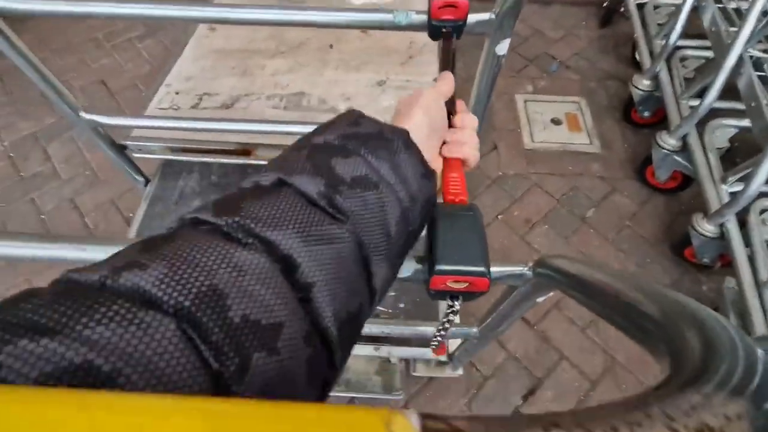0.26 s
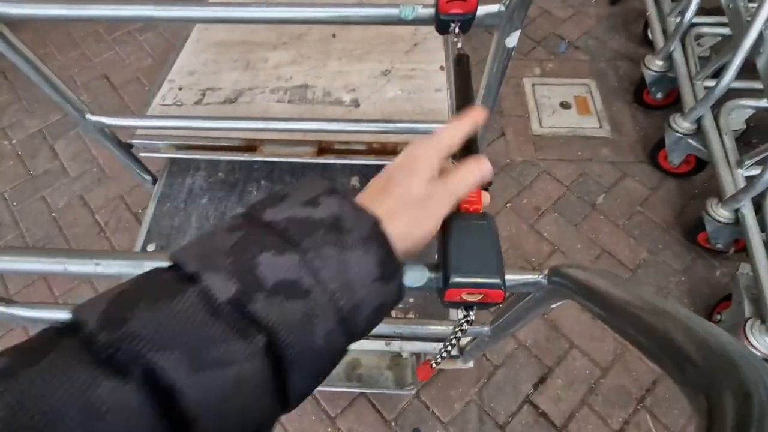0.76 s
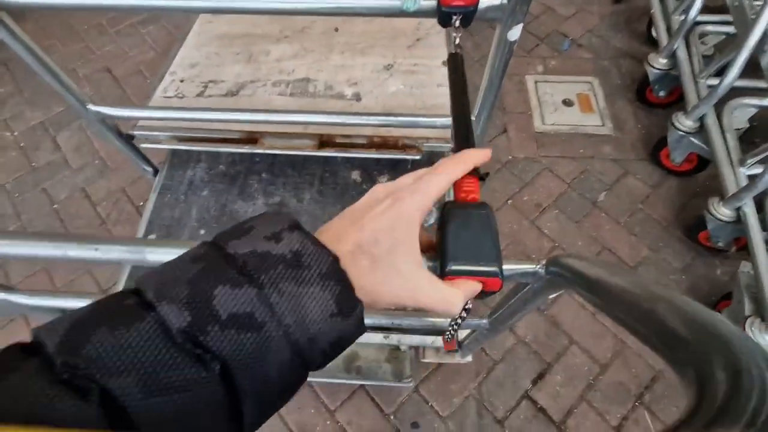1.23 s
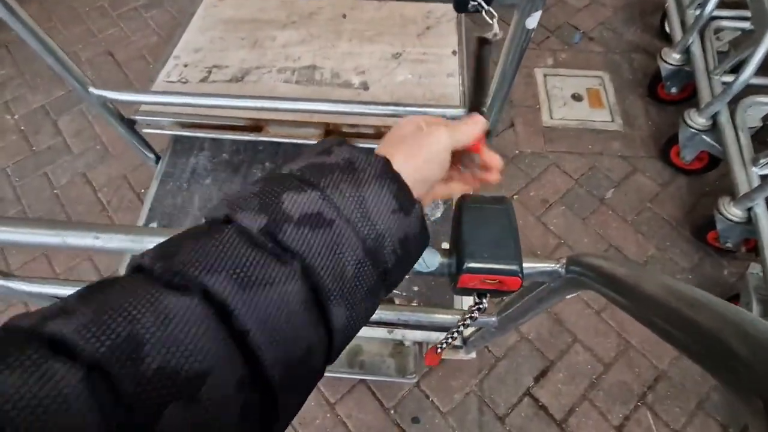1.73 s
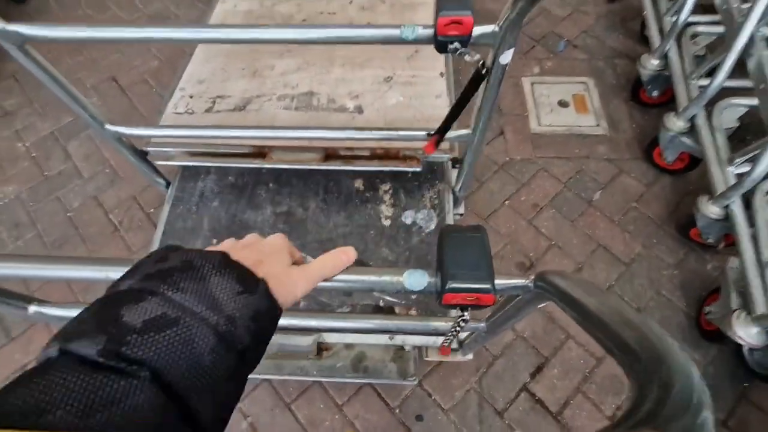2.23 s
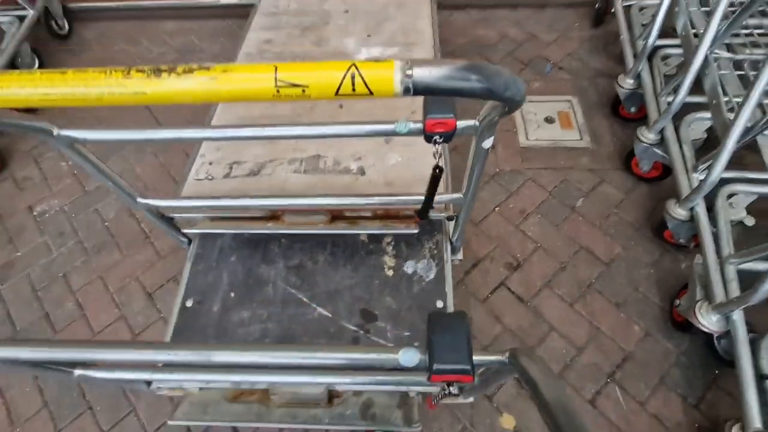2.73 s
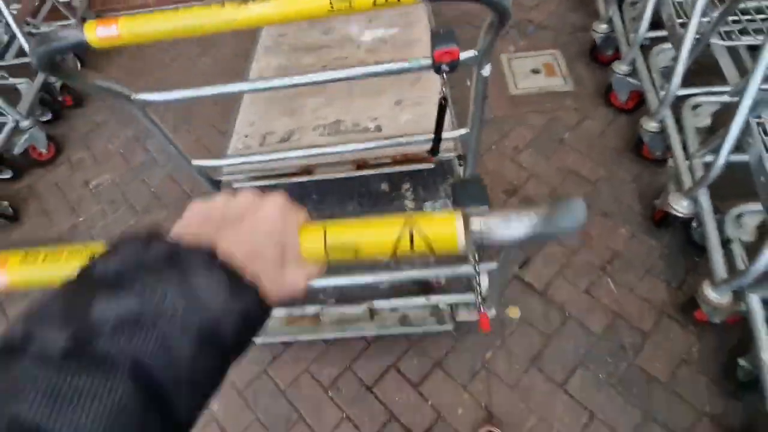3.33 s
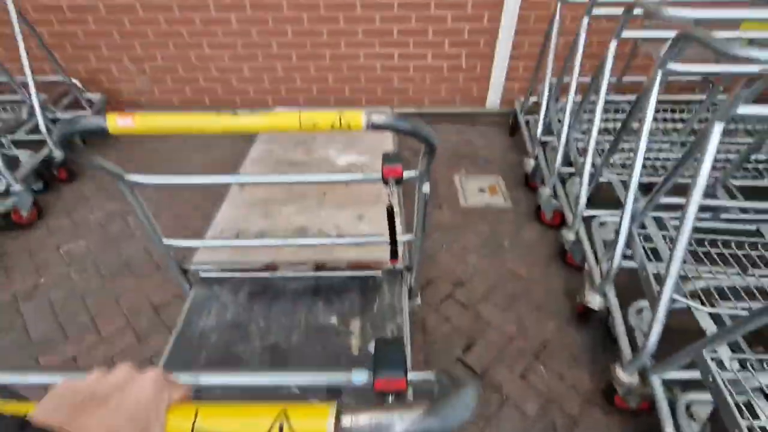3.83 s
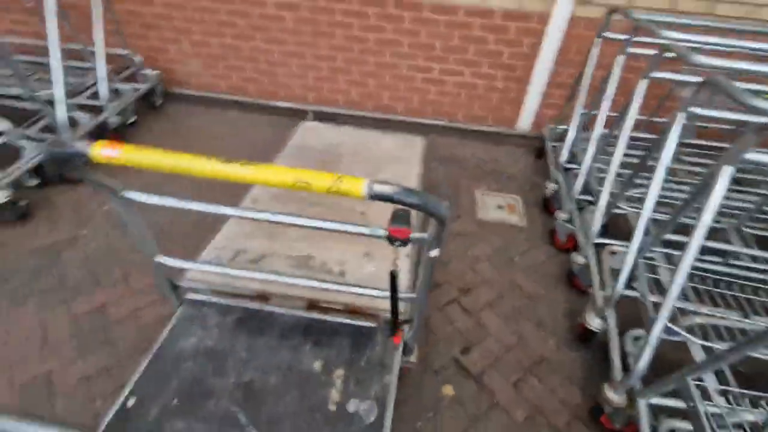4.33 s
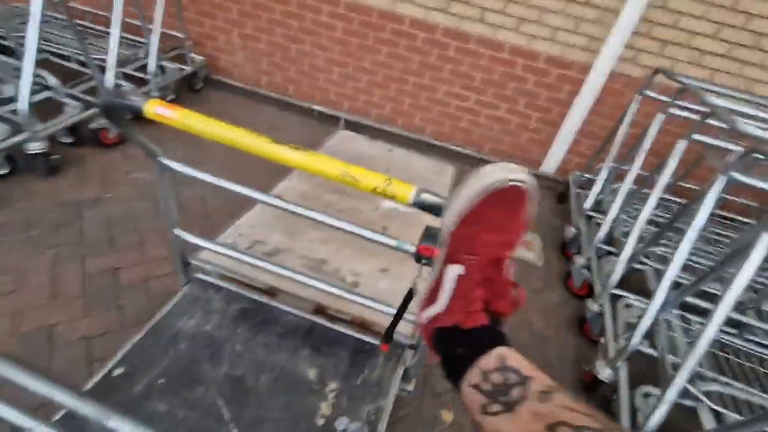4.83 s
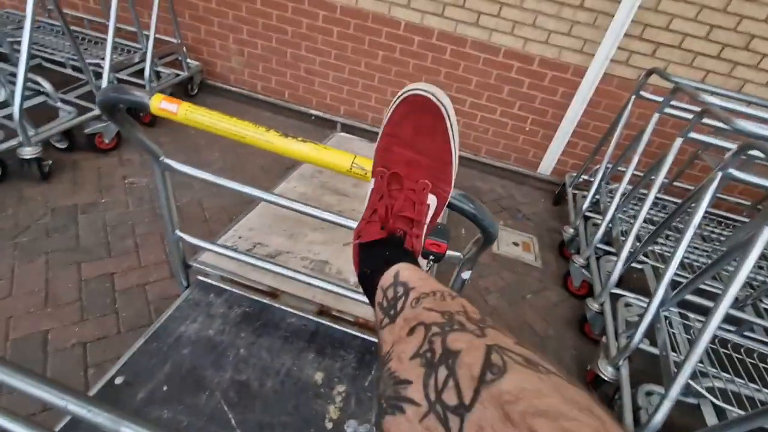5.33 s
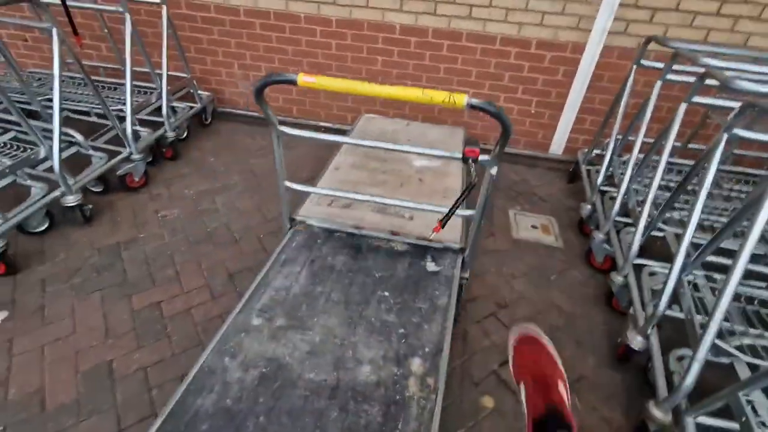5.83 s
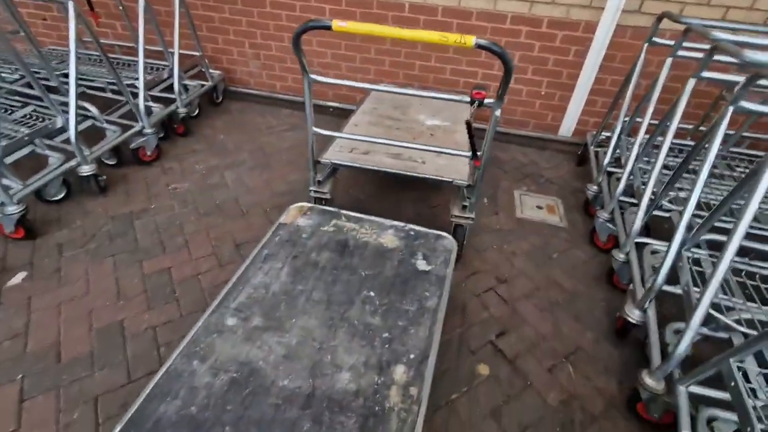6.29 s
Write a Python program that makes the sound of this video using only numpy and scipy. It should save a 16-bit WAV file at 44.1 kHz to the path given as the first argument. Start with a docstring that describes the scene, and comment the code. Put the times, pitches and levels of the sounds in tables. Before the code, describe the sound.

Sleeve rustle and small metallic clicks, a sharp snap as the key comes free, then a steel trolley bangs, booms and rattles across bricks.

```python
"""A low town rumble and throb with a sleeve rustling near the phone; then a hand fumbles the coin lock of
a steel flatbed trolley, frees the key, and the trolley is pulled over brick paving.
Rumble, rustle and throb are coloured noise. Knocks of lock, chain and swinging key are noise cracks with a
sine clink and a dying shiver, and ringing parts are beating, fading sines.
The rolling deck, frame and wheels are noise grains sent through resonances and filters."""
import sys
import numpy as np
from scipy import signal
from scipy.fft import rfft, irfft, next_fast_len
from scipy.io import wavfile
from scipy.ndimage import uniform_filter1d

SR = 44100
rng = np.random.default_rng(int(sys.argv[2]) if len(sys.argv) > 2 else 0)


def persist_wave(psi):
    """Save psi, clipped to +-1, as 16-bit WAV."""
    counts = np.round(np.clip(psi, -1, 1) * 32767).astype(np.int16)
    wavfile.write(sys.argv[1], SR, np.atleast_2d(counts).T)


N = 289205  # samples


def undb(db):
    """Amplitude ratio of a level in dB."""
    return 10 ** (np.asarray(db) / 20)


def level(x, db):
    """Scale a signal to an RMS level in dB."""
    return x * undb(db) / np.sqrt(np.mean(x ** 2))


def colour(x, points):
    """Filter by (frequency [Hz], gain [dB]) points joined on a log frequency axis."""
    n = next_fast_len(x.shape[-1])
    hz, db = np.transpose(points)
    f = np.arange(n // 2 + 1) * SR / n + 1  # the 1 avoids log(0)
    gain = undb(np.interp(np.log(f), np.log(hz), db))
    return irfft(rfft(x, n) * gain, n)[..., :x.shape[-1]]


# Stereo width at the phone: (frequency [Hz], side relative to mid [dB])
SIDE_WIDTH = [(30, -9.5), (125, -15.5), (300, -15), (600, -6), (900, -6), (1400, 2), (4000, -2.5),
              (14000, 3.5)]
PORT_LAG = 4  # samples by which the right port hears later


def pair(mid, side):
    """Left and right ports from two unrelated signals; the bass is mostly shared."""
    side = colour(side, SIDE_WIDTH)
    return np.array([mid + side, np.roll(mid - side, PORT_LAG)])


def noise():
    """Stereo white noise as the two ports share it."""
    return pair(rng.standard_normal(N), rng.standard_normal(N))


def walk(rate):
    """Random levels held 1 / rate seconds and slewed twice; spread near 1."""
    hold = int(SR / rate)
    steps = np.repeat(rng.standard_normal(N // hold + 1), hold)
    return 1.32 * uniform_filter1d(uniform_filter1d(steps, hold), hold)[:N]


def fade(t, t60):
    """Exponential decay that loses 60 dB in t60 seconds."""
    return np.exp(-np.log(1000) * t / t60)


def add(out, s, x):
    """Mix a stereo sound into out, starting at s seconds."""
    i = int(s * SR)
    out[:, i:i + x.shape[1]] += x[:, :N - i]


def grains(rate, spread_db, t60):
    """Stereo noise broken into little impacts of uneven size, rate per second on average."""
    hits = (rng.random(N) < rate / SR) * undb(spread_db * rng.exponential(size=N))
    envelope = signal.lfilter([1], [1, -fade(1 / SR, t60)], hits)
    return level(noise() * envelope, 0)


def curve(tables, column):
    """Gain along one column of several time spans, silent outside them."""
    t, gain = np.arange(N) / SR, 0
    for rows in tables:
        rows = np.array(rows)
        edge = np.clip(np.minimum(t - rows[0, 0], rows[-1, 0] + .05 - t) / .05, 0, 1)  # 50 ms fades
        gain = gain + edge * undb(np.interp(t, rows[:, 0], rows[:, column]))
    return gain


def both(a, b):
    """Gain of two causes that add in power."""
    return np.hypot(a, b)


def crowd(spread_db, gap_hz):
    """(frequency [Hz], gain [dB]) of a crowd of close modes, too many to tell apart."""
    hz = np.arange(200, 16000, gap_hz)
    return np.transpose([hz, spread_db * (2 * rng.random(len(hz)) - 1)])


# Spectrum of the distant town: (frequency [Hz], relative level [dB])
TOWN_SPECTRUM = [(13, -40), (22, -13.5), (87, 9.5), (310, -10.5), (457, -20), (730, -10.5), (2260, -24.5),
                 (3610, -33.5), (7390, -34), (8970, -92), (11800, -34.5), (14700, -51), (16000, -84)]
TOWN_DB, SWELL_DB = -36.5, 1.8  # RMS level; spread of the swelling


def town():
    """Distant traffic: a low noise that swells a little."""
    return level(colour(noise(), TOWN_SPECTRUM) * undb(SWELL_DB * walk(1.11)), TOWN_DB)


# Beside the phone: (time [s], sleeve rustle [dB], low throb before its trim [dB])
NEAR_PHONE = [(0, -48.5, -33), (0.45, -59, -35.5), (0.65, -53, -40), (0.9, -50, -33.5), (1.6, -53.5, -37.5),
              (1.85, -38.5, -35), (2.15, -45.5, -28), (2.4, -44, -29), (2.8, -45.5, -30), (3, -78, -29.5),
              (3.4, -41, -32), (4, -47, -26.5), (4.2, -40, -30.5), (4.55, -53, -36), (4.8, -40, -42.5),
              (5.2, -60, -32), (5.45, -52, -40), (6.55, -41, -32)]
# Spectrum of rubbing nylon: (frequency [Hz], relative level [dB])
SLEEVE_SPECTRUM = [(470, -55), (800, -21), (1080, -15), (1550, 1.5), (1810, 4.5), (3140, 2.5), (4030, -2),
                   (5440, -1), (8660, -16.5), (12500, -13.5), (16000, -94)]
PULL_RUSTLE_DB, PULL_THROB_DB = -9.5, -6  # rustle re frame shake curve, throb re deck rumble curve


def close_by():
    """Fine grains of nylon rubbing near the phone, and a low throb; both grow as the trolley moves."""
    sleeve = colour(grains(2500, 0.68, 0.026), SLEEVE_SPECTRUM) * undb(0.74 * walk(14.0))
    throb = colour(noise(), [(15, -40), (30, -13), (55, 7.0), (100, -3.0), (150, -6.5), (300, -56.0)])
    rustle_gain = both(curve([NEAR_PHONE], 1), undb(PULL_RUSTLE_DB) * curve(MOVES, 1))
    throb_gain = both(curve([NEAR_PHONE], 2), undb(PULL_THROB_DB) * curve(MOVES, 3))
    return level(sleeve, 0) * rustle_gain + level(throb, -5.0) * throb_gain


# Metal on metal: (time [s], relative blow level [dB], lows before the treble tilt [dB],
# relative shiver level [dB], clink frequency [Hz])
METAL_KNOCKS = [(0.1347, -20, -11, -13.5, 2370), (0.1753, -29, 11.5, -1.5, 2330),
                (0.3283, -17, 4, -17, 7600), (0.36, -22.5, 8, -5.5, 5470), (0.39, -15, -16, -9, 7300),
                (0.4022, -27, 15, 0, 3460), (0.447, -27, 8, -4.5, 2850), (0.4803, -17.5, 9, -15, 3840),
                (0.553, -23, 6, -10, 2280), (0.597, -23.5, 6, -8.5, 3700), (0.684, -29.5, 13, 0.5, 2680),
                (0.7598, -25.5, 12, -13, 1830), (0.809, -20.5, 7, -5, 2770), (0.831, -14, 2, -13, 2250),
                (0.868, -22, 10, -9.5, 2760), (0.962, -29, 24, -15, 2360), (0.999, -24, 10, -14, 2340),
                (1.0686, -16.5, -10, -17, 6160), (1.0897, -23.5, 11, -10, 1860),
                (1.266, -27, 12, -10, 2820), (1.3022, -13, 3, -11, 3300), (1.468, -21.5, -3, -19, 2800),
                (1.4754, -22, 10.5, -2.5, 2600), (1.651, -29, -14, -8, 3120), (1.672, -26, -14, -9, 2600),
                (1.6908, -18.5, 0, -17, 3900), (1.7123, -19.5, 1, -4.5, 2850), (1.7394, -26, -8, -9, 4600),
                (1.7603, -15, 7, -10.5, 5540), (1.799, -20, -23, -5, 4700), (1.817, 0, -4, -12, 6980),
                (1.8305, -12.5, 0, 4.5, 6340), (2.0696, -20.5, -4, -9.5, 1920),
                (2.1883, -8.5, -3, -4, 2910), (2.2425, -24.5, 7, 0, 1830), (2.3609, -21, 1.5, 9.5, 2810),
                (2.497, -25, 8, 0.5, 3080), (2.591, -25, 4, -5.5, 2800), (2.676, -33, 4.5, 10.5, 2820),
                (2.8084, -29, 2, -7, 2010), (2.954, -32, 9, -8.5, 3050), (3.53, -9, -12, 1.5, 3600),
                (3.6244, -11, 17, -0.5, 2210), (3.7392, -17, 16, -1, 1740), (3.828, -22.5, 29, -7.5, 2080),
                (3.932, -26, 30.5, -7, 2220), (4.066, -27.5, 26, -7, 1810), (4.1079, -8.5, 7.5, -3.5, 2390),
                (4.3355, -24.5, 14, -4, 1980), (4.679, -15.5, 7.5, 4.5, 5750), (4.743, -28, 14, 4, 7220),
                (5.2867, -31, 22.5, -1.5, 2100), (5.3587, -34, 32.5, -4, 2400), (5.486, -25, -4, -1, 2090),
                (5.5316, -15, 12.5, 0.5, 1890), (5.5913, -17, 24, 5.5, 2270), (5.6343, -22, 24, 7.5, 1900),
                (5.7, -27, 18, 7, 1900), (5.7444, -18.5, 13.5, 10, 1990), (5.997, -19.5, 0, 3, 7600),
                (6.18, -23, 8, 9.5, 2070), (6.253, -22, 0, 7, 5970), (6.296, -27, 22, 4.5, 1500),
                (6.387, -10, 12, -1, 1700)]
# Steel colour of a knock: (frequency [Hz], gain [dB])
STEEL_COLOUR = [(200, -3.5), (700, 12), (1500, 15.5), (3000, 14.5), (6000, 8.5), (9000, -9), (12000, -2.5),
                (15000, -16.5)]
TREBLE_DB, DULL_FROM_DB, DULLING = 13.5, 4, 0.73  # treble; heavier lows than this dull it, dB per dB
FAR_FROM_S = 3  # from here on the knocks are on the frame, away from the phone
AIR_DB, FAR_AIR_DB = 1.5, -4.5  # top of a knock re its treble, near and away


def knocks():
    """A brief noise crack with a clink, then wire and tubing shiver in their crowded modes."""
    out, t = np.zeros((2, N)), np.arange(SR // 2) / SR
    steel = colour(noise(), STEEL_COLOUR)
    steel = np.concatenate([steel, steel], axis=1)
    ringing = colour(steel, crowd(9., 35.))
    crack = level(steel, -6.5)
    shiver = level(colour(ringing, [(6000, -1.5), (12000, -2.0)]), -10.5)  # slightly duller at the top
    ports = np.array([[1], [-1]])
    edges = np.clip(np.minimum(t / 0.002, (t[-1] - t) / .1), 0, 1)
    for s, db, low_db, tail_db, clink_hz in METAL_KNOCKS + ticks():
        i = int(s * SR)
        high_db = TREBLE_DB - DULLING * max(low_db - DULL_FROM_DB, 0)
        air_db = AIR_DB if s < FAR_FROM_S else FAR_AIR_DB
        tint = [(500, low_db), (1500, low_db / 2 - 4.0), (3000, 0), (5000, 0),
                (8000, high_db), (12000, high_db + air_db)]
        t60 = 0.27 * undb(0.52 * tail_db)  # a blow that shakes more of the frame dies more slowly
        blow = crack[:, i:i + len(t)] * fade(t, 0.018)
        blow = blow + undb(tail_db) * shiver[:, i:i + len(t)] * fade(t, t60)
        clink = undb(-5.5) * fade(t, 0.021) * np.sin(2 * np.pi * clink_hz * t + 0.33 * ports)
        add(out, s - .001, (colour(blow, tint) + clink) * edges * undb(db))
    return out


FUMBLE_S, TICK_COUNT = (0.15, 1.1), 22  # start and end of the fumbling
TICK_DB, TICK_SPREAD_DB, TICK_SHIVER_DB = -35, 4, -13  # blow level, its range either way, shiver


def ticks():
    """Faint chain ticks as knock rows left to chance, at any moment while the hand works the lock."""
    start, end = FUMBLE_S
    rows = []
    for when, size, pitch in rng.random((TICK_COUNT, 3)):
        db = TICK_DB + TICK_SPREAD_DB * (2 * size - 1)
        rows.append((start + when * (end - start), db, 4.0, TICK_SHIVER_DB, 2200 + 1800 * pitch))
    return rows


# Blows that leave a ring: (time [s], part struck, relative blow level [dB])
RINGING_BLOWS = [(0.492, "link", -41), (.555, "handle", -40), (1.301, "lock", -37), (1.83, "tongue", -16.5),
                 (2.188, "crossbar", -35), (2.363, "crossbar", -22.5), (2.363, "washer", -23),
                 (2.364, "rail", -24.5), (2.43, "crossbar", -31), (2.498, "crossbar", -34),
                 (2.505, "rail", -29), (2.69, "crossbar", -38), (2.69, "rail", -37), (2.676, "washer", -36),
                 (3.531, "upright", -26), (3.53, "link", -19), (3.531, "rod", -22.5),
                 (3.531, "washer", -33), (3.544, "handle", -28), (3.628, "wheel", -16),
                 (3.66, "wheel", -12), (3.755, "wheel", -19), (3.63, "rail", -24), (3.624, "board", -11),
                 (3.739, "board", -22), (3.827, "board", -26), (3.931, "board", -23), (4.18, "handle", -36),
                 (4.335, "brace", -33), (4.108, "upright", -23.5), (4.106, "handle", -22),
                 (4.108, "brace", -19.5), (4.108, "rod", -19), (4.109, "link", -31), (4.108, "lock", -27),
                 (4.337, "deck", -31), (4.337, "wheel", -23), (4.677, "washer", -24),
                 (4.679, "crossbar", -27.5), (4.68, "upright", -31), (4.742, "handle", -24.5),
                 (4.743, "upright", -32.5), (4.742, "rod", -26), (5.1, "board", -29.5),
                 (5.36, "board", -34.5), (5.487, "brace", -31.5), (5.533, "kicked bar", -8),
                 (5.647, "board", -17), (5.748, "board", -17), (5.55, "deck", -23), (5.594, "deck", -21.5),
                 (5.596, "handle", -26), (5.637, "deck", -26), (5.848, "wheel", -18), (5.872, "wheel", -19),
                 (5.758, "wheel", -15), (5.644, "rail", -22), (5.745, "brace", -28), (5.704, "wheel", -12),
                 (5.816, "wheel", -16), (5.997, "rod", -31.5), (5.998, "handle", -32.5),
                 (6.21, "handle", -33), (6.183, "brace", -22.5), (6.254, "washer", -27),
                 (6.292, "wheel", -21), (6.405, "wheel", -23), (6.388, "upright", -27),
                 (6.405, "rail", -18), (6.453, "rail", -29), (6.41, "deck", -31), (6.388, "board", -28),
                 (6.388, "brace", -25)]
# Modes of each part: name -> (frequency [Hz], relative level [dB], nominal t60 [s])
PART_MODES = { "tongue": [(6525, 0, .3), (6756, -9, .22)], "link": [(3666, 0, .14), (4770, -1, .2)],
              "washer": [(5749, 0, .22), (6150, -8, .13)], "crossbar": [(764, -8, .15), (2008, -7, .22),
              (2261, -6, .25), (2767, -4, .25), (2848, -4, .2), (3350, -5, .15), (3881, -12, .2),
              (4237, -8, .3), (4985, -5, .3), (5250, -7, .15)], "upright": [(2169, -4, .3), (2293, -7, .4),
              (2385, 0, .3), (2659, -11, .28), (3000, -12, .25), (3252, -7, .15), (3445, -12, .25)],
              "handle": [(764, -9, .14), (1335, 0, .26), (1395, -5, .25), (1567, -10, .25)],
              "rail": [(1453, -9, .25), (1614, 0, .17), (1857, -12, .25)], "brace": [(2056, 0, .18),
              (1992, -8, .2)], "rod": [(7165, -5, .3), (7221, 0, .29), (7483, -9, .2), (7650, -11, .14),
              (7948, -10, .2), (8702, -15, .2)], "deck": [(180, -4, .25), (255, -3, .2), (321, -2, .25),
              (498, -2, .15), (557, -1, .2), (689, -4, .08), (826, -7, .2), (942, -6, .18), (1038, -7, .14),
              (1178, -10, .15)], "board": [(600, -5, .05), (760, 0, .05), (950, -5, .04)],
              "wheel": [(160, 0, .07), (225, 0, .07), (320, -4, .09)], "kicked bar": [(517, 0, .1),
              (689, -5, .07), (1023, -9, .08)], "lock": [(2213, -3, .12), (3198, 0, .12), (3418, 0, .16)], }
BUZZ_DB = 3  # loose joints make a ring flutter
LINGER_DB, LINGER = -13, 2.6  # the frame carries a ring on: level, and how many times longer


def rings():
    """Each blow starts the modes of one part; every mode has a close twin that beats with it."""
    out, t = np.zeros((2, N)), np.arange(int(.6 * SR)) / SR
    chance = rng.standard_normal((len(RINGING_BLOWS), 10, 5))
    buzz = BUZZ_DB * np.minimum(np.tile(walk(90), 2), 1)
    ports = np.array([[1], [-1]])
    for (s, part, blow_db), luck in zip(RINGING_BLOWS, chance):
        for (hz, db, t60), (size, start, turn, split, twin) in zip(PART_MODES[part], luck):
            port_phase = 0.73 * min(hz / 1200, 1) * np.sign(turn) * ports
            phase = 2 * np.pi * hz * t + 3 * start + port_phase
            wave = np.sin(phase) + .4 * np.sin(phase + 2 * np.pi * 35 * split * t + 3 * twin)
            flutter = undb(buzz[int(s * SR + hz):][:len(t)] * np.minimum(t / .02, 1))
            linger = (400 < hz < 4500) * undb(LINGER_DB) * fade(t, LINGER * t60)
            decay = flutter * (fade(t, t60) + linger) * (1 - t / t[-1])
            attack = np.minimum(t / 0.0023, 1)
            add(out, s, undb(blow_db + db + size) * attack * decay * wave)
    return out


# Each move of the trolley, levels before trims:
# (time [s], frame shake [dB], wheel hiss [dB], deck rumble [dB])
MOVES = [
    [(3.25, -62, -45, -50), (3.53, -29.5, -30, -24.5), (3.61, -20.5, -45, -20), (3.65, -22, -34, -18.5),
     (3.78, -29, -61, -18.5), (4, -44, -43, -37.5), (4.2, -31.5, -56, -27.5), (4.3, -38, -43, -54),
     (4.37, -31.5, -60, -24), (4.55, -52.5, -47, -36)],
    [(5.25, -47, -40, -54), (5.48, -40.5, -55, -36), (5.55, -22, -32, -26), (5.64, -15.5, -22.5, -16.5),
     (5.72, -21.5, -22, -16), (5.79, -21.5, -24.5, -17.5), (5.85, -25.5, -30, -17.5),
     (5.91, -27.5, -52, -25), (6.12, -42.5, -38, -37.5)],
    [(6.18, -32, -32, -29), (6.27, -39, -14.5, -26), (6.33, -25.5, -24, -28), (6.375, -24.5, -25, -26.5),
     (6.41, -22, -36.5, -22.5), (6.5, -32, -64, -30.5), (6.55, -39, -63, -41)],
]
# Colour of the rattling frame: (frequency [Hz], gain [dB])
FRAME_COLOUR = [(240, -34), (400, -20), (453, -12), (545, -2), (1600, -5.5), (3750, -15), (12500, -19),
                (15300, -58), (16000, -91)]
IDLE_DECK_DB = -4.5  # the resting deck hums with the throb, re the throb curve
JANGLE_RING_DB = -3.5  # tube modes shaken by the rattle, re its noise


def resonate(x, hz, t60, damping):
    """One mode as a resonant peak; more damping makes it broader and shorter."""
    return signal.lfilter(*signal.iirpeak(hz, hz * t60 / damping, SR), x)


def rolling():
    """Hard wheels jolt over brick joints: the deck booms in its modes, the frame jangles, the wheels hiss."""
    jolts = grains(500, 3.6, 0.13)
    boom = sum(undb(db) * resonate(jolts, hz, t60, 12.0) for hz, db, t60 in PART_MODES["deck"][:3])
    thud = colour(jolts, [(60, -75.0), (130, 13.5), (400, 1.0), (700, -16.5), (2500, -58)])
    deck = level(boom, -22.5) + level(thud, -19.0)

    rattle = grains(500, 2.1, .025)
    frame = colour(colour(rattle, FRAME_COLOUR), crowd(5., 30.))
    tubes = [mode for part in ("handle", "rail", "upright") for mode in PART_MODES[part]]
    tubes = tubes + PART_MODES["deck"][3:]
    shaken = sum(undb(db) * np.sqrt(t60) * resonate(frame, hz, t60, 3.5) for hz, db, t60 in tubes)
    jangle = colour(frame, [(300, -32), (500, -3.0), (3200, -4.5), (5000, -36.0), (9000, -57)])
    jangle = level(jangle, 0) + level(shaken, JANGLE_RING_DB)

    hiss = colour(frame, [(2000, -12.5), (3000, -31), (4200, -6), (9000, -4.0), (12000, -4.0), (15000, 19)])
    deck_gain = both(undb(IDLE_DECK_DB) * curve([NEAR_PHONE], 2), curve(MOVES, 3))
    out = level(deck, -3.5) * deck_gain
    out = out + level(jangle, -0.16) * curve(MOVES, 1)
    return out + level(hiss, -5.5) * curve(MOVES, 2)


def scene():
    """Town, sleeve and throb, lock and frame knocks, ringing parts and the rolling trolley together."""
    return town() + close_by() + knocks() + rings() + rolling()


# Mismatch of the phone's two ports: (frequency [Hz], left minus right [dB])
PORT_MISMATCH = [(500, -0.24), (1000, 0.5), (2000, 1), (4000, -3), (8000, 1.5), (12000, 0.5)]
TOP_HZ = 15300  # the phone passes nothing much above this


def record(dry):
    """Each port is coloured its own way; loud peaks round off and the top is cut."""
    left = colour(dry[0], [(hz, db / 2) for hz, db in PORT_MISMATCH])
    right = colour(dry[1], [(hz, -db / 2) for hz, db in PORT_MISMATCH])
    rounded = np.tanh(0.88 * np.array([left, right])) / 0.76
    low_pass = signal.ellip(8, .2, 70, TOP_HZ, fs=SR, output="sos")
    return signal.sosfilt(low_pass, rounded)


dry = scene()
out = record(dry)
persist_wave(out)
```